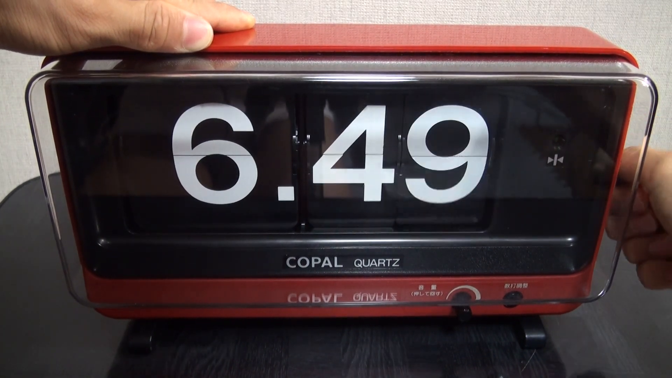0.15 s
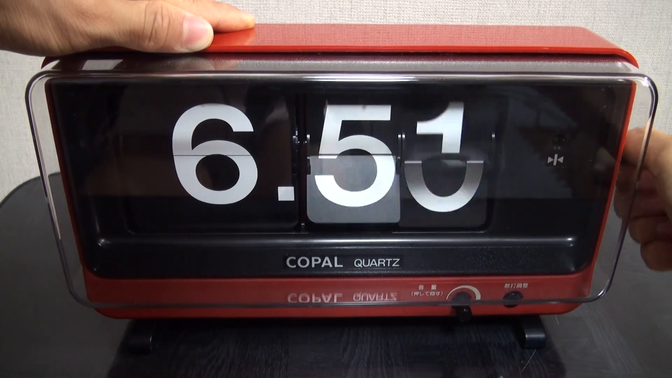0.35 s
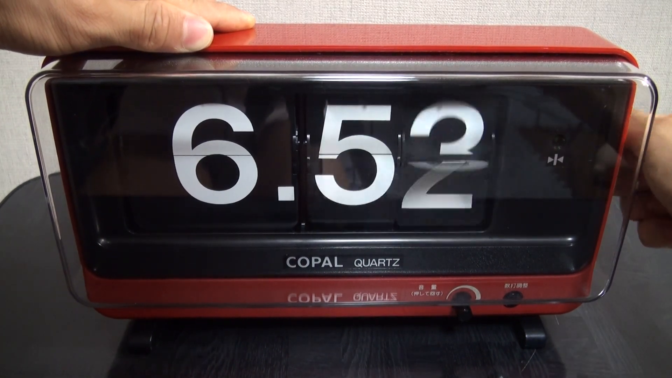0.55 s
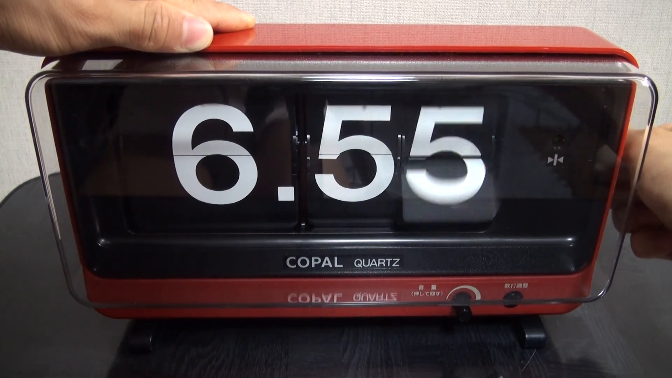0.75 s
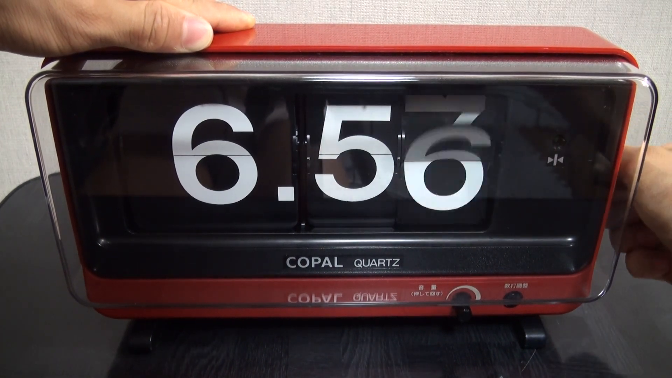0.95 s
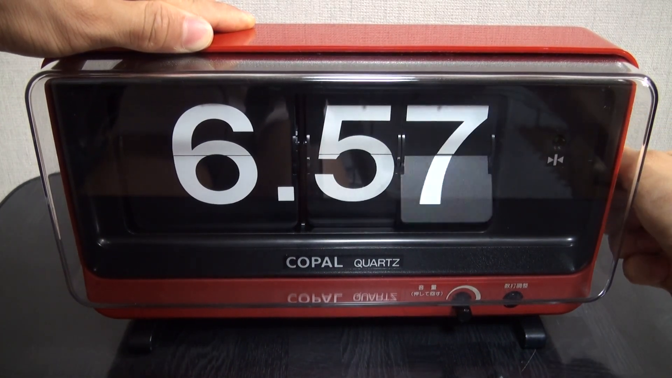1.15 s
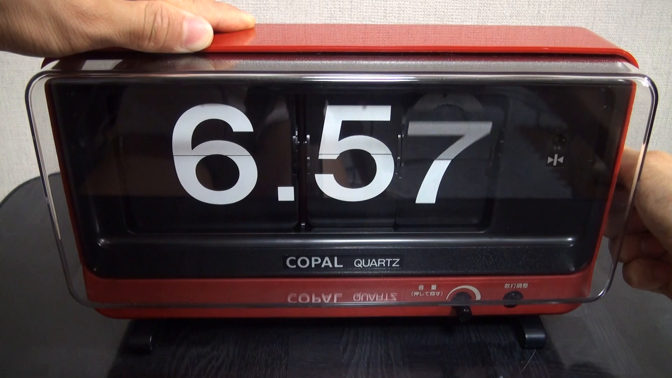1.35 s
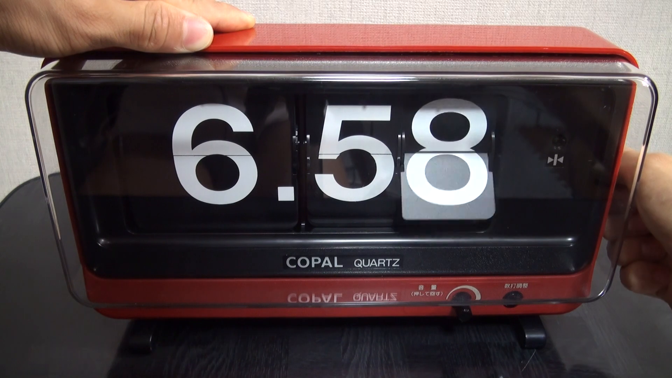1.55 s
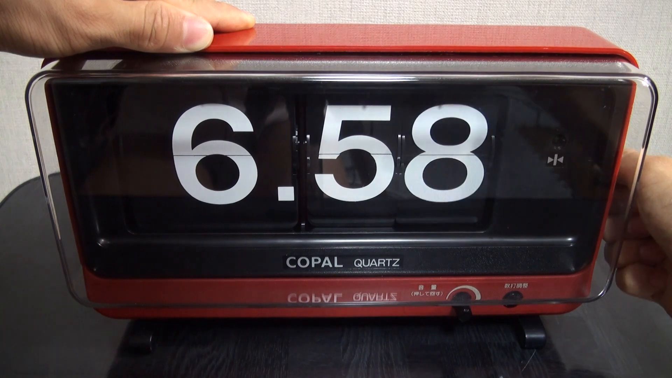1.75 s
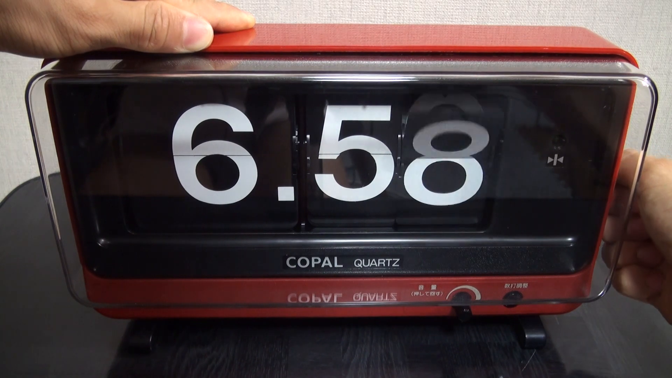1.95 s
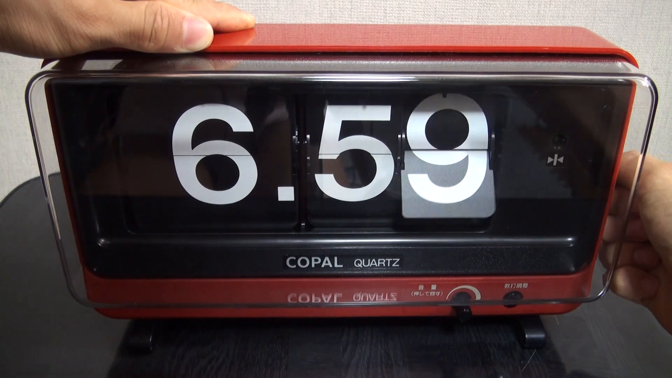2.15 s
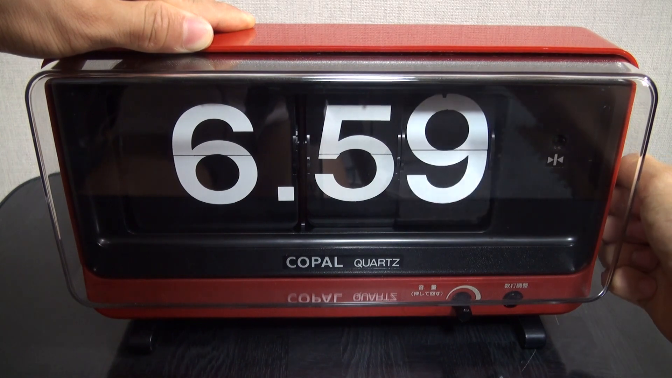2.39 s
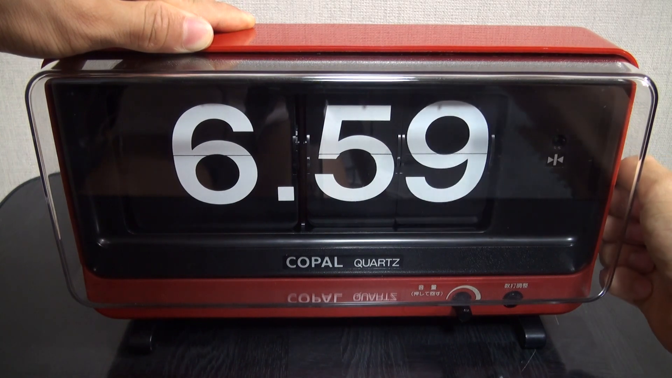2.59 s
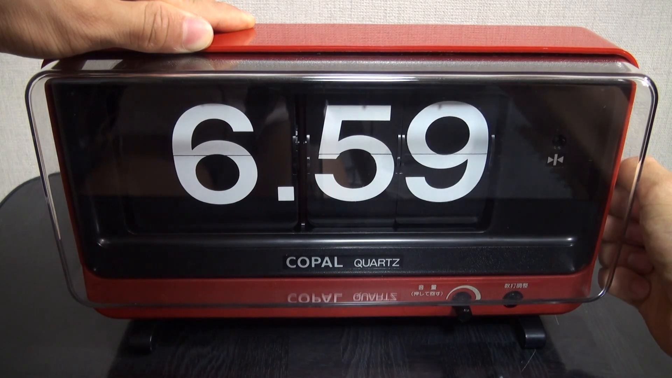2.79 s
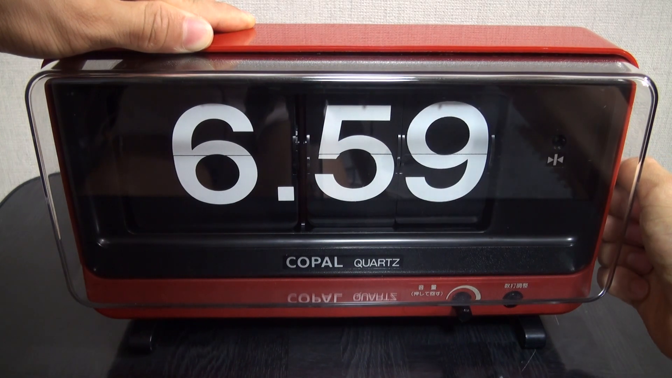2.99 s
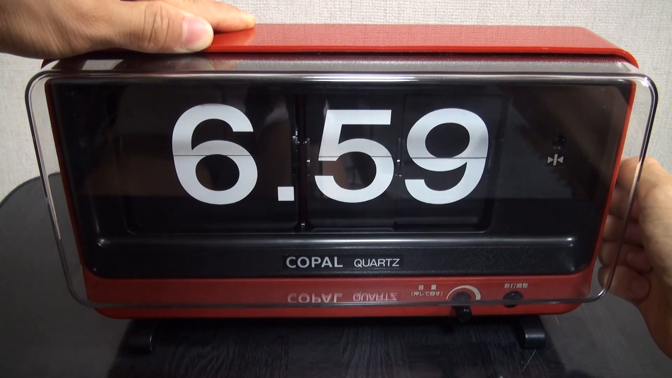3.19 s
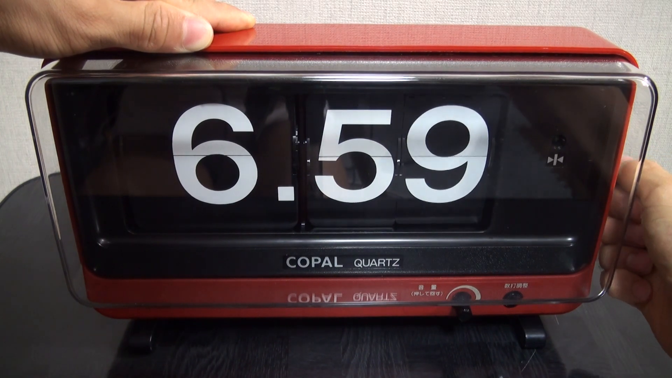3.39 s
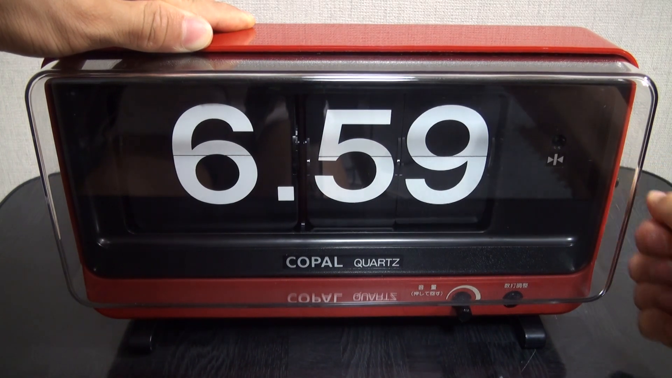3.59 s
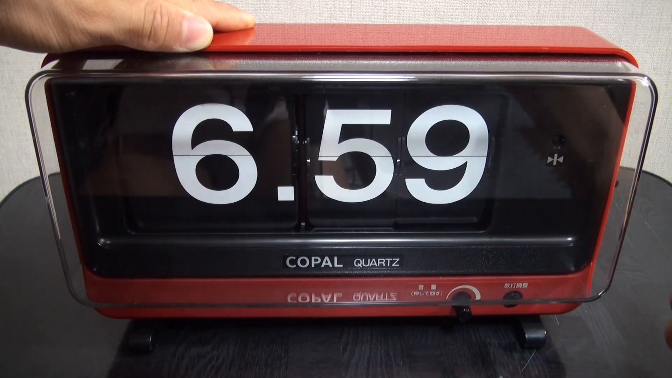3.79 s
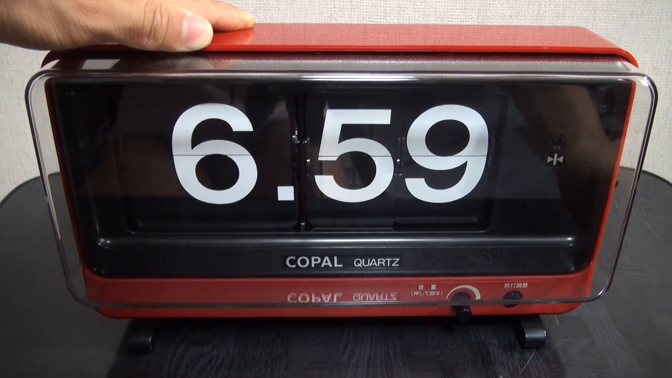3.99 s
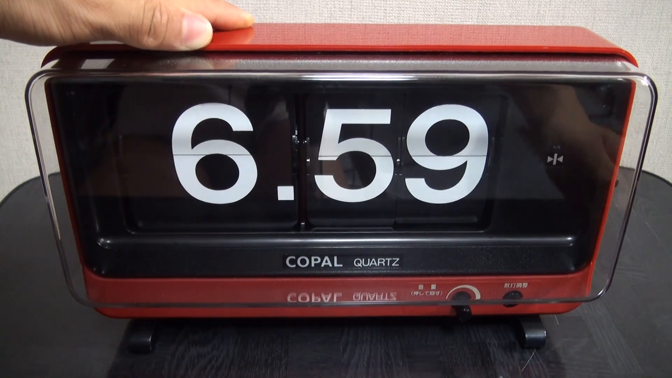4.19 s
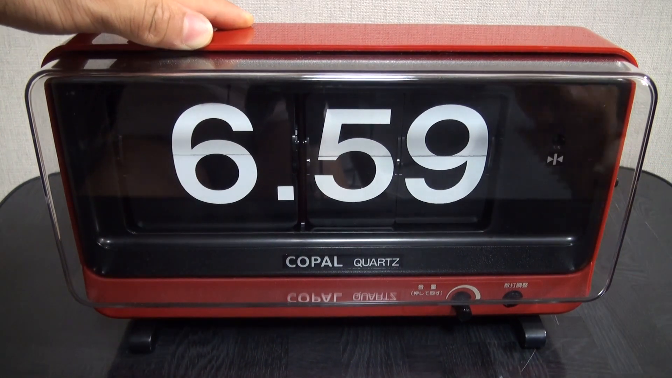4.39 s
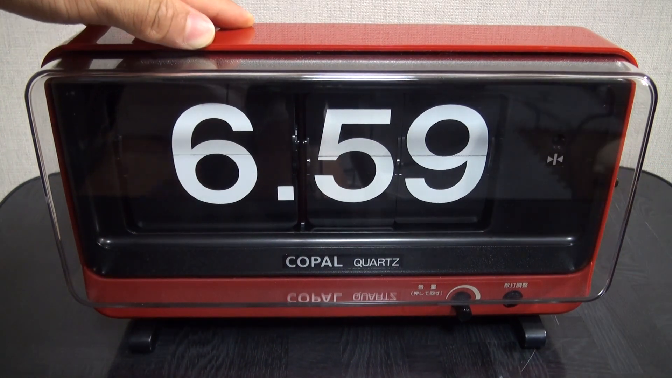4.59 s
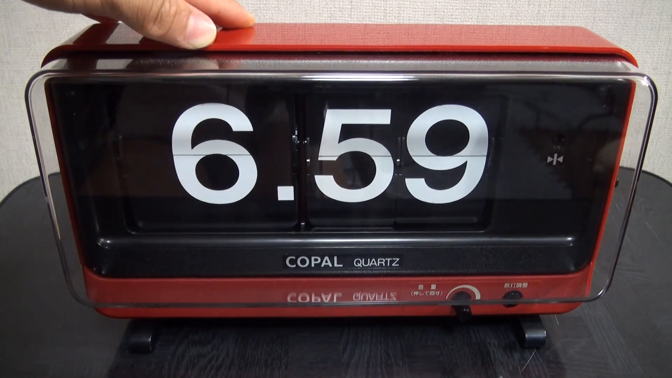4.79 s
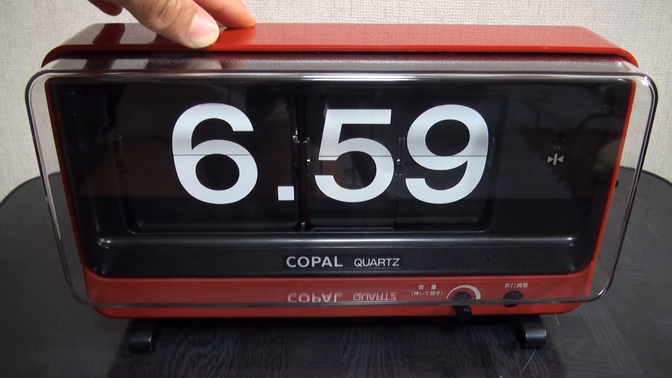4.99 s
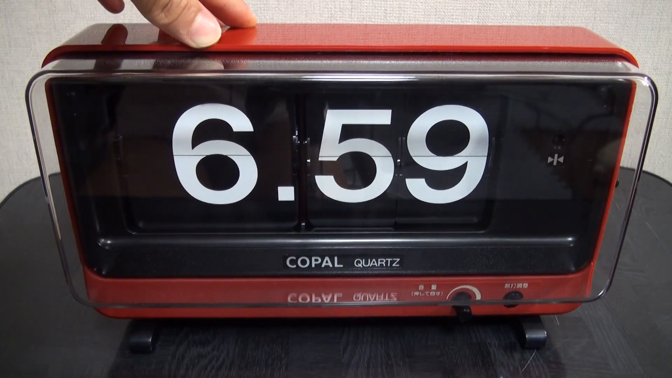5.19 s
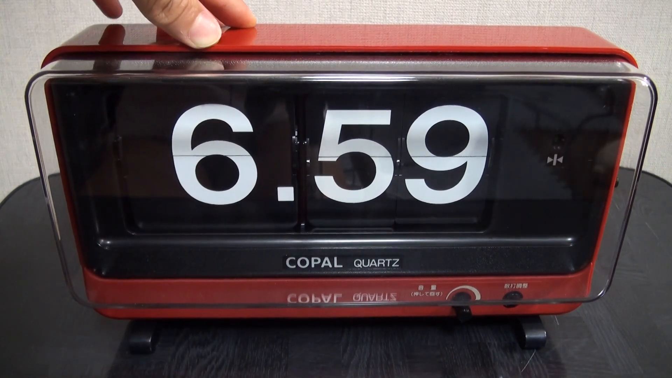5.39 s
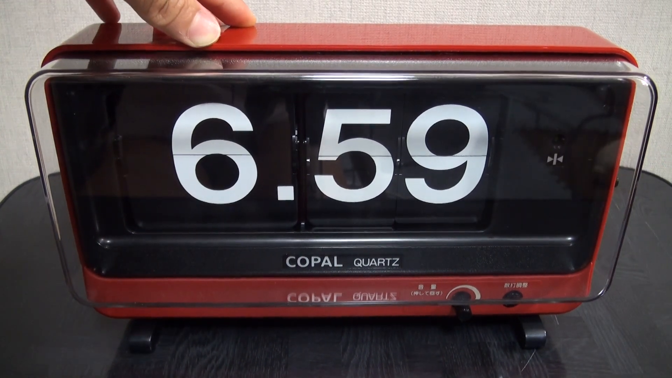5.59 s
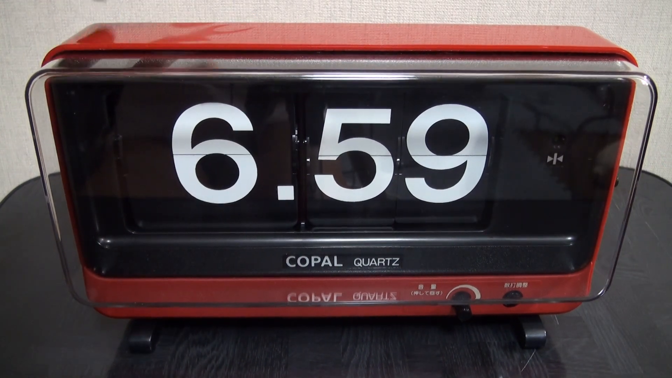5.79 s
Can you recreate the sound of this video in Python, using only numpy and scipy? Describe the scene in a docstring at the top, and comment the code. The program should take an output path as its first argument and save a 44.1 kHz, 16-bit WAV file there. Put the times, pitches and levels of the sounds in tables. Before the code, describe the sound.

A flip clock in a plastic case is set forward by hand, close to the microphone. For the first second, the knob snaps about ten times a second while cards slap onto the stack, making a bright, rattling clatter over a dull flutter. The turning then slows: single sharp snaps with a hollow clack come at about 1.3 and 1.8 seconds, and cards brush faintly down between them, settling with soft bumps around 2.1 to 2.4 seconds. After a pause, one more snap sounds at 3.2 seconds. At 3.4 the knob is released with a brief rub and a hollow knock. The case gives a light, dry tick at 4 seconds and a soft bump just after. Near 5.7 seconds comes a sharper tick and a quick cluster of smaller ones as the hand lifts. The room is small and quiet, with a faint hiss and low hum throughout.

```python
"""A quick clatter of slapping cards and snaps: a flip clock in a plastic case is set forward by hand.
The knob's detent snaps at each minute; spun fast, the cards slap onto the stack, turned slowly they
only flutter down. Then the fingers slip off the knob, and the steadying hand shifts and lifts,
making the case tick. It is all close by, in a small quiet room with a faint hiss and hum."""
import sys
import numpy as np
from scipy import signal
from scipy.fft import rfft, irfft
from scipy.io import wavfile

SR = 44100
rng = np.random.default_rng(int(sys.argv[2]) if len(sys.argv) > 2 else 0)


def bounce(signal):
    """Save signal as a 16-bit WAV file at the path given by the first command-line argument."""
    frames = np.transpose(np.atleast_2d(signal))
    limited = np.clip(frames, -1, 1)
    pcm = np.round(limited * 32767).astype(np.int16)
    wavfile.write(sys.argv[1], SR, pcm)


N = 257965
TIME = np.arange(N) / SR
AGE = np.arange(int(0.4 * SR)) / SR   # seconds into a single hit

# one snap for each minute on the dial: start_s, level_db, tilt_db_per_octave, rattle_db, clack_hz, ring_hz
DETENT_SNAPS = [(0.2061, -6, -0.5, 2, 2300, 7600), (0.3162, -7.5, 0.1, -1, 2600, 4370),
                (0.4181, -9, -1.5, 3.5, 2320, 6200), (0.52, -8.5, -0.6, 1, 2440, 6860),
                (0.607, -7.5, -.5, -2, 1800, 6700), (0.6958, -6.5, -0.5, -1.5, 2180, 7800),
                (0.8001, -9.5, 0.2, 10, 1880, 5400), (0.9381, -5.5, 0.5, -2.5, 2180, 6000),
                (1.267, -6.5, -0.33, 1, 1670, 9000), (1.815, -6.5, 0, -2.5, 1550, 7300),
                (3.1681, -6, 0.5, -1, 2270, 5760)]
# modes of the case and its front cover: pitch_hz, level_db, t60_s
CASE_MODES = [(166.8, 0, 0.25), (217.6, 3, 0.35), (275.5, 4.5, 0.14), (382, -1.5, 0.16),
              (475.5, 0.5, 0.047), (511, -1.5, 0.11), (774.5, 3, 0.099), (884, 4.5, 0.13), (1167, 2, 0.098),
              (1290, 0, 0.084), (1914, -2, 0.087), (2150, 3.5, 0.083), (2600, 7, 0.098)]
# tone of the case when touched: frequency_hz, level_db
CASE_COLOUR = [(100, -13.5), (215, 4), (360, 0), (510, 5.5), (760, -4.5), (1100, 0.5), (2500, -2.5),
               (4400, -5.5), (6500, -6.5), (11000, -11), (15500, -31)]
# resonances of the card drum and its springs: centre_hz, width_hz, boost_db
DRUM_PEAKS = [(1864, 120, 4), (2344, 110, 2), (2670, 73, 4), (4300, 100, 6), (5350, 260, 5.5),
              (7220, 160, -1.5), (8650, 120, -13), (9050, 110, -1), (12240, 180, -4.5), (13200, 120, 1),
              (13700, 200, 8), (14500, 200, 6)]


def detents(gain_db):
    """The knob's detent snaps with a hollow clack and a bright ring, shaking the whole drum of cards."""
    # tone of the snap: frequency_hz, level_db
    snap_colour = [(100, -14), (250, -9), (550, 6), (700, -6), (1300, 2), (2100, 1), (2800, 0.5),
                   (3900, -3.5), (5700, -4.5), (7200, -4.5), (8700, 0.5), (10800, -4), (12700, 4.5),
                   (15500, -6)]
    clack_q, clack_db, ring_q, ring_db = 5.5, 5, 5.9, 6.5
    out = np.zeros((2, N))
    blow = striker(snap_colour, thump_db=-11.5, length_s=0.0077, rise_s=0.0011,
                   rattle_t60=0.19, drum_db=1.5, rattle_side_db=0)
    for start_s, level_db, tilt_db, rattle_db, clack_hz, ring_hz in DETENT_SNAPS:
        peaks = [(clack_hz, clack_hz / clack_q, clack_db), (ring_hz, ring_hz / ring_q, ring_db)]
        add(out, start_s, from_db(level_db + gain_db) * blow(peaks, rattle_db, tilt_db))
    return out


def card_slaps(gain_db):
    """Cards slap onto the stack or flick past the catch; all alike, they share one bright tone."""
    # card hits: start_s, level_db
    slaps = [(0.0004, -11), (0.0411, -7.5), (0.3529, -14), (0.3559, -11), (0.4614, -12), (0.466, -9),
             (0.56, -11), (0.565, -8), (0.661, -8), (0.728, -13), (0.738, -8.5), (0.784, -26), (0.834, -8),
             (0.9, -23.5), (0.928, -13), (1.062, -32.5), (1.109, -36), (1.245, -22), (1.5262, -33.5),
             (1.802, -29)]
    # tone of a slap: frequency_hz, level_db
    slap_colour = [(100, -32.5), (300, -4.5), (1000, -6.5), (2200, -3), (3800, -7), (4800, -4.5),
                   (7000, -2.5), (8400, 0), (10000, -5.5), (12200, -4), (13500, -12.5), (15500, -17)]
    # resonances of a card: centre_hz, width_hz, boost_db
    card_peaks = [(2000, 350, 1), (8500, 1400, 3.5)]
    out = np.zeros((2, N))
    blow = striker(slap_colour, thump_db=-12.5, length_s=0.0088, rise_s=0.00064,
                   rattle_t60=0.15, drum_db=7, rattle_side_db=-6)
    for start_s, level_db in slaps:
        add(out, start_s, from_db(level_db + gain_db) * blow(card_peaks, rattle_db=-4))
    return out


def card_flutter(fall_db, judder_db, side_db):
    """Loose cards brush in a dull, juddering rasp: louder as the knob spins faster, swelling as one falls."""
    # a card slides off the catch: start_s, length_s, level_db
    slides = [(1.061, 0.039, -44), (1.116, 0.038, -42.5), (1.515, 0.041, -41), (1.652, 0.018, -51.5),
              (2.0, 0.088, -54.5), (2.111, 0.041, -42.5), (2.234, .03, -49), (2.362, 0.019, -53)]
    # tone of card brushing card: frequency_hz, level_db
    brush_colour = [(100, -15.5), (200, -2), (330, -1.5), (470, 3), (680, -8), (1100, -7), (1900, -7),
                    (2600, -10.5), (3600, -18.5), (6000, -23.5), (7600, -16.5), (9500, -25), (12500, -27.5),
                    (15500, -42)]
    jostle_db, at_flips_per_s, db_per_doubling = -42, 9.9, 6
    rumble_db, rumble_top_hz = -4, 300
    jostle = from_db(jostle_db + db_per_doubling * np.log2(knob_speed() / at_flips_per_s + 1e-9))
    falls = sum(from_db(level_db) * swell(TIME - start_s, length_s, rise_s=0.0083, fall_s=0.027)
                for start_s, length_s, level_db in slides)
    knots = np.linspace(0, TIME[-1], num=900)
    judder = from_db(judder_db * np.interp(TIME, knots, rng.standard_normal(len(knots))))
    touches = grains(N, per_s=9000, spread_db=1.5) * judder
    brush = unit_energy(coloured(touches, brush_colour, peaks=DRUM_PEAKS))
    rasp = np.hypot(from_db(fall_db) * falls, jostle) * brush
    # the jostling drum shakes the case's lowest modes
    low_modes = mode_shapes([mode for mode in CASE_MODES if mode[0] < rumble_top_hz])
    low_ring = unit_energy(ringing(low_modes, uneven_db=0))
    rumble = signal.fftconvolve(jostle * unit_energy(touches), low_ring[None], axes=1)[:, :N]
    return (rasp + from_db(rumble_db) * rumble) * np.sqrt(N) * from_db([[0], [side_db]])


def knob_speed():
    """Flips per second: one flip from each snap to the next, at rest before the first and after the last."""
    snaps_s = np.transpose(DETENT_SNAPS)[0]
    flips_per_s = np.pad(1 / np.diff(snaps_s), 1)
    return flips_per_s[np.searchsorted(snaps_s, TIME)]


def knob_release(start_s, rub_db, knock_db, swell_s, knock_delay_s):
    """The knob slides back through its play under the fingers and comes to rest with a hollow knock."""
    # tone of the rub: frequency_hz, level_db
    rub_colour = [(150, -16), (260, -11), (550, 6), (730, -16), (950, -0.5), (1250, -3), (1450, -4.5),
                  (2400, -1), (3200, -14), (4000, -15), (5500, -26), (8000, -26), (14000, -43)]
    # modes of the knob and its shaft: pitch_hz, level_db, t60_s
    knob_modes = [(226, -21, 0.16), (280, -17.5, 0.14), (486, -8.5, 0.099), (565, 1, 0.053),
                  (614, -10, .06), (933, -14, .05), (1256, -11, 0.058)]
    out = np.zeros((2, N))
    pressure = swell(AGE - swell_s, hold_s=0.008, rise_s=0.008, fall_s=0.01)
    rub = coloured(rng.standard_normal((2, len(AGE))), rub_colour) * pressure
    add(out, start_s, from_db(rub_db) * unit_energy(rub))
    knock = unit_energy(ringing(mode_shapes(knob_modes), uneven_db=-0.5) * onset(rise_s=0.0062))
    add(out, start_s + knock_delay_s, from_db(knock_db) * np.array([knock, knock]))
    return out


def case_ticks(gain_db):
    """The case gives with a dry tick as the hand's weight shifts."""
    # ticks under the hand: start_s, level_db, tilt_db_per_octave
    ticks = [(3.941, -41, 0), (3.993, -21, .3), (5.65, -13.5, 0.1), (5.718, -28, -3), (5.735, -23.5, -3),
             (5.753, -29, 3.5), (5.7655, -22.5, -1.5)]
    # resonances of the creaking plastic: centre_hz, width_hz, boost_db
    cover_peaks = [(1780, 210, 1.5), (3850, 1100, 3.5), (5700, 1100, 2)]
    out = np.zeros((2, N))
    blow = striker(CASE_COLOUR, thump_db=-8.5, length_s=0.0082, rise_s=0.00055,
                   rattle_t60=0.13, drum_db=-6, rattle_side_db=0)
    for start_s, level_db, tilt_db in ticks:
        add(out, start_s, from_db(level_db + gain_db) * blow(cover_peaks, rattle_db=-4, tilt_db=tilt_db))
    return out


def soft_bumps(gain_db):
    """A settling card or a fingertip sounds the same case, with little treble."""
    # soft contacts: start_s, level_db
    bumps = [(2.112, -28), (2.242, -36), (3.093, -42.5), (3.367, -36), (4.225, -32)]
    # the hollow of the case: centre_hz, width_hz, boost_db
    hollow = (380, 110, 2.9)
    out = np.zeros((2, N))
    blow = striker(CASE_COLOUR, thump_db=-4.5, length_s=0.0088, rise_s=0.0016,
                   rattle_t60=0.12, drum_db=-4, rattle_side_db=-3)
    for start_s, level_db in bumps:
        add(out, start_s, from_db(level_db + gain_db) * blow([hollow], rattle_db=0.5, tilt_db=-5.5))
    return out


def striker(colour, thump_db, length_s, rise_s, rattle_t60, drum_db, rattle_side_db):
    """One kind of blow: plastic cracks on plastic, the loose cards shiver on, the drum and case ring."""
    shapes = mode_shapes([(hz, db + at_hz(colour, hz), t60) for hz, db, t60 in CASE_MODES])
    drum = rng.standard_normal((2, len(AGE)))   # dense modes, the same for every blow of this kind
    attack = onset(rise_s)

    def blow(peaks, rattle_db, tilt_db=0):
        """A single blow, as mid and side."""
        crack = rng.standard_normal((2, len(AGE))) * attack * np.exp(-(AGE / length_s) ** 2)
        crack = unit_energy(coloured(crack, colour, tilt_db, peaks))
        shiver = rng.standard_normal((2, len(AGE)))
        rattle = (shiver + from_db(drum_db) * drum) * attack * decay(rattle_t60)
        rattle = unit_energy(coloured(rattle, colour, tilt_db, peaks + DRUM_PEAKS))
        rattle *= from_db([[0], [rattle_side_db]])
        snap = (crack + from_db(rattle_db) * rattle) / np.hypot(1, from_db(rattle_db))
        thump = unit_energy(ringing(shapes, uneven_db=0.5) * (1 - np.exp(-AGE / length_s)))
        return snap + from_db(thump_db) * thump
    return blow


def room_reverb(source, wet_db, side_db, build_s):
    """A short, diffuse tail builds up after the direct sound and lingers longest in the bass."""
    # the room's decay: frequency_hz, t60_s
    decay_times = [(150, 0.68), (400, 0.29), (1000, 0.4), (2800, 0.35), (7000, 0.3), (15000, 0.52)]
    # tone of the tail: frequency_hz, level_db
    tail_colour = [(90, -1.5), (170, 4.5), (300, 4), (700, 2), (2000, 0), (4000, 0.5), (9000, -6),
                   (14000, -18)]
    tail, edges_hz = 0, np.geomspace(70, 18000, 13)
    for low, high in zip(edges_hz, edges_hz[1:]):
        bandpass = signal.butter(2, [low, high], "band", fs=SR, output="sos")
        band = signal.sosfilt(bandpass, rng.standard_normal((2, len(AGE))))
        tail = tail + band * decay(at_hz(decay_times, np.sqrt(low * high)))
    tail = coloured(unit_energy(tail * onset(build_s)), tail_colour)
    return from_db([[wet_db], [wet_db + side_db]]) * signal.fftconvolve(tail, source[:1], axes=1)[:, :N]


def room_tone(hiss_db, waver):
    """Soft hiss with a faint wavering hum, as mid and side."""
    # tone of the hiss: frequency_hz, level_db
    hiss_colour = [(12, -37), (20, -6), (53, -8), (123, -6), (163, -12), (204, -4.5), (241, -2),
                   (270, -0.5), (328, -9.5), (357, -11.5), (513, -12), (558, -12.5), (2140, -21),
                   (14700, -32), (16000, -29.5)]
    # partials of the hum: pitch_hz, level_db
    hum_partials = [(78, -71.5), (120, -68), (218, -68), (229, -74), (275, -64.5), (358, -70.5)]
    # stereo width of the room tone: frequency_hz, side_db
    air_width = [(60, -31), (110, -23), (200, -25), (380, -10), (700, -3), (1290, 0.5), (2380, 1.5),
                 (4400, 1), (8120, -2), (15000, -6)]
    hiss = unit_energy(coloured(rng.standard_normal((2, N)), hiss_colour)) * np.sqrt(N)
    hum, knots = 0, np.linspace(0, TIME[-1], num=50)
    for pitch_hz, level_db in hum_partials:
        drift = rng.standard_normal(len(knots)) + 1j * rng.standard_normal(len(knots))
        sway = 1 + waver * np.interp(TIME, knots, drift)   # in both level and phase
        hum = hum + from_db(level_db) * np.real(sway * np.exp(2j * np.pi * pitch_hz * TIME))
    mid, side = from_db(hiss_db) * hiss + hum
    return mid, coloured(side, air_width)


def mode_shapes(modes):
    """One decaying sine for each mode."""
    return np.array([from_db(db) * np.sin(2 * np.pi * hz * AGE) * decay(t60) for hz, db, t60 in modes])


def ringing(shapes, uneven_db):
    """A blow sets every mode ringing with a strength and polarity of its own."""
    strengths = from_db(uneven_db * rng.standard_normal(len(shapes)))
    return (strengths * rng.choice([-1, 1], len(shapes))) @ shapes


def grains(size, per_s, spread_db):
    """Random micro-contacts of uneven strength, as mid and side."""
    touches = (rng.random(size) < per_s / SR) * from_db(spread_db * rng.standard_normal(size))
    return touches * rng.standard_normal((2, size))


def onset(rise_s):
    """A rounded attack from silence to full level."""
    return 1 - np.exp(-(AGE / rise_s) ** 2)


def decay(t60):
    """An envelope that falls 60 dB in t60 seconds."""
    return np.exp(-np.log(1000) * AGE / t60)


def swell(age, hold_s, rise_s, fall_s):
    """An envelope that grows up to age zero, holds, and fades."""
    return np.exp(np.minimum(age, 0) / rise_s - np.maximum(age - hold_s, 0) / fall_s)


def coloured(x, curve, tilt_db=0, peaks=(), size=4096):
    """Minimum-phase EQ: a tone curve, a tilt per octave about 2 kHz, and resonant peaks."""
    hz = np.maximum(np.arange(size // 2 + 1) * SR / size, 1)
    db = at_hz(curve, hz) + tilt_db * np.log2(np.maximum(hz, 500) / 2000)
    db = db + sum(boost / (1 + (2 * (hz - centre) / width) ** 2) for centre, width, boost in peaks)
    cepstrum = irfft(np.log(from_db(db)), size)
    cepstrum[1:size // 2] *= 2   # folded forward, so nothing rings ahead of a hit
    cepstrum[size // 2 + 1:] = 0
    response = irfft(np.exp(rfft(cepstrum)), size)
    return signal.oaconvolve(np.atleast_2d(x), response[None], axes=1)[:, :x.shape[-1]].reshape(x.shape)


def at_hz(curve, hz):
    """Read a curve on a log-frequency axis."""
    points_hz, values = np.transpose(curve)
    return np.interp(np.log(np.maximum(hz, 1)), np.log(points_hz), values)


def from_db(db):
    """Decibels to gain."""
    return 10 ** (np.asarray(db) / 20)


def unit_energy(x):
    """Scale each channel to an energy of one."""
    return x / np.sqrt(np.sum(x ** 2, axis=-1, keepdims=True) + 1e-20)


def add(track, start_s, sound):
    """Mix a sound into the track."""
    start = max(round(start_s * SR), 0)
    track[:, start:start + sound.shape[-1]] += sound[:, :N - start]


def scene():
    """The clock and its room, mixed as mid and side, then spread to a narrow left and right."""
    # stereo width of the clock: frequency_hz, side_db
    width = [(100, -29), (250, -26), (600, -16), (1400, -11.5), (2500, -11.5), (5000, -14), (9500, -14),
             (12500, -5.5), (15500, -2)]
    # the top treble leans right: frequency_hz, right_minus_left_db
    lean = [(100, 0), (5000, 0), (10000, 0.8), (13500, 2.2), (16000, 8)]
    clock = detents(gain_db=14) + card_slaps(gain_db=13.5)
    clock += case_ticks(gain_db=14.5) + soft_bumps(gain_db=16)
    clock += card_flutter(fall_db=0.5, judder_db=3, side_db=-1.5)
    clock += knob_release(start_s=3.412, rub_db=-2.5, knock_db=-2.5, swell_s=0.018, knock_delay_s=0.014)
    mid, side = clock + room_reverb(clock, wet_db=-11.5, side_db=1, build_s=0.0033)
    side = coloured(side, width)
    left = coloured(mid + side, [(hz, -db / 2) for hz, db in lean])
    right = coloured(mid - side, [(hz, db / 2) for hz, db in lean])
    air_mid, air_side = room_tone(hiss_db=-55.13, waver=0.56)
    return np.array([left + air_mid + air_side, right + air_mid - air_side])


def record(dry):
    """A steep low-pass takes off the very top."""
    cutoff_hz = 15800
    return signal.sosfilt(signal.ellip(10, 0.2, 80, cutoff_hz, fs=SR, output="sos"), dry)


dry = scene()
out = record(dry)
bounce(out)
```